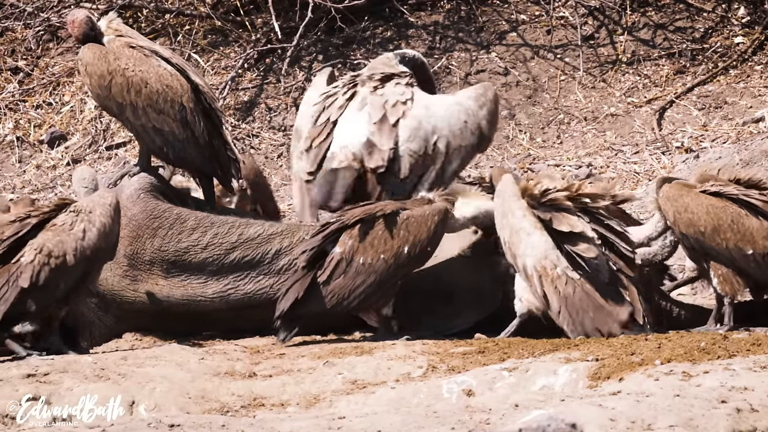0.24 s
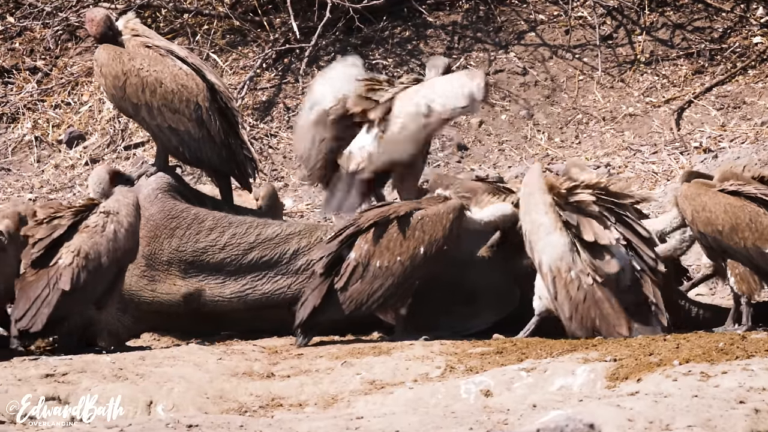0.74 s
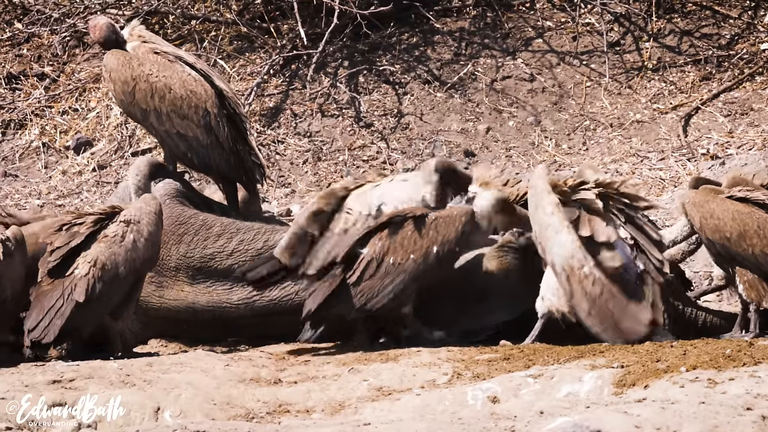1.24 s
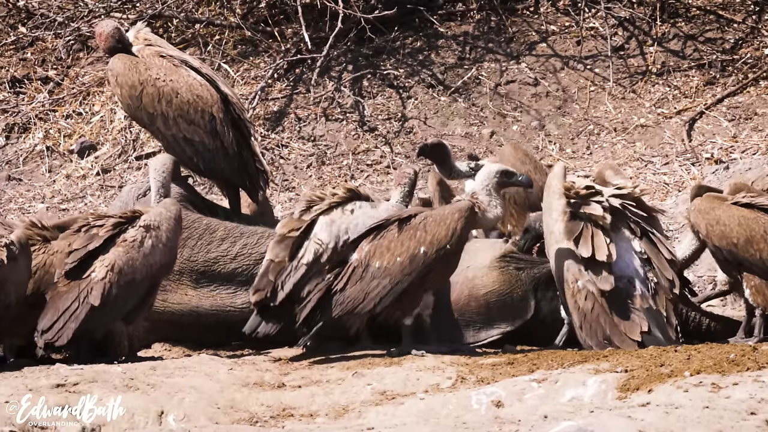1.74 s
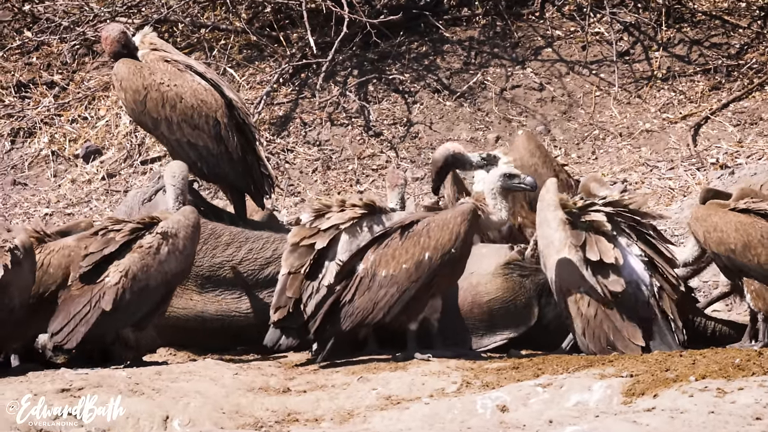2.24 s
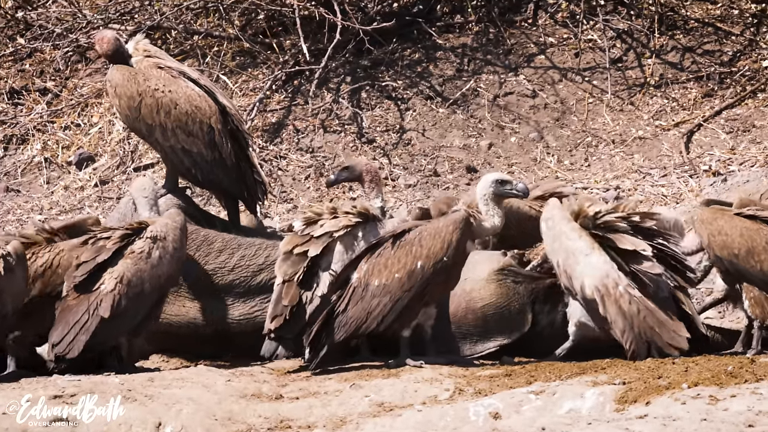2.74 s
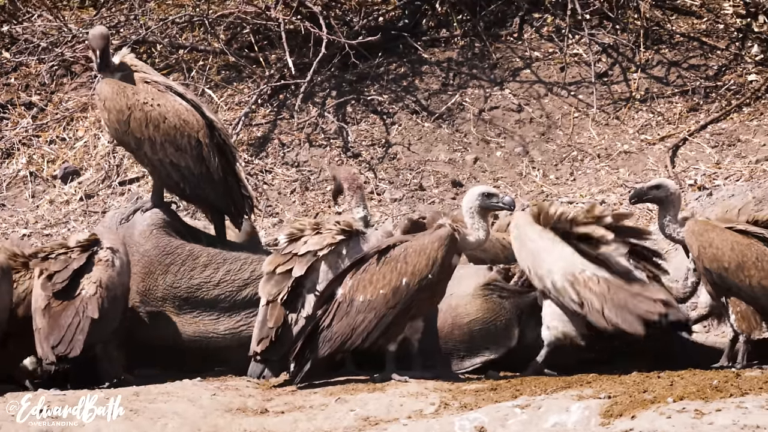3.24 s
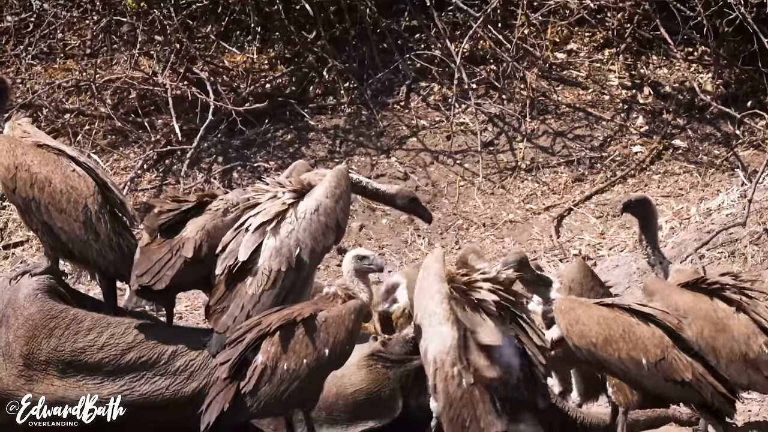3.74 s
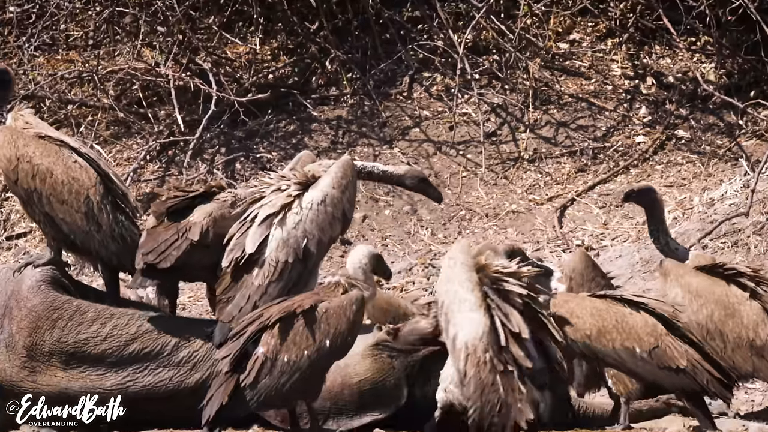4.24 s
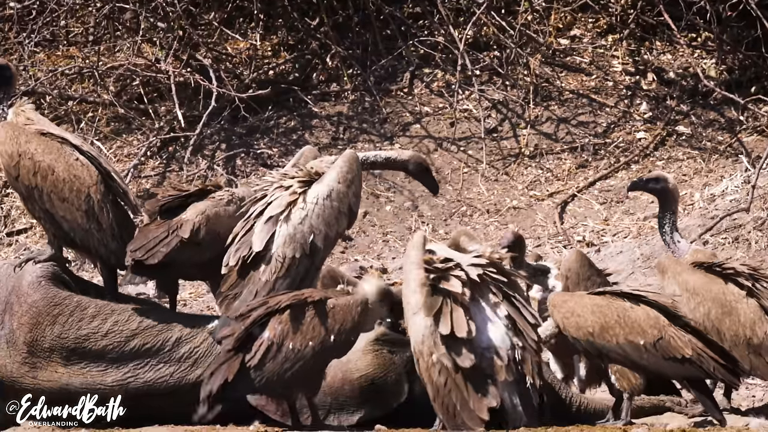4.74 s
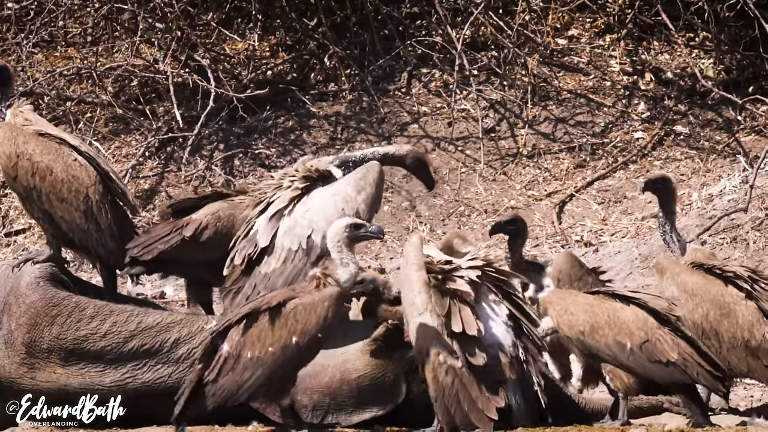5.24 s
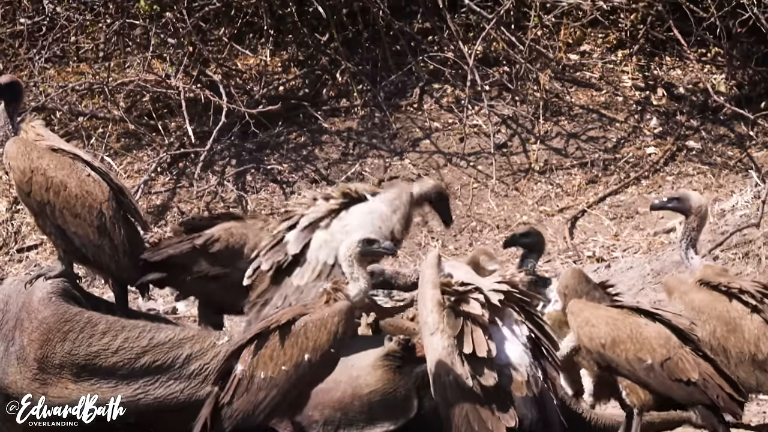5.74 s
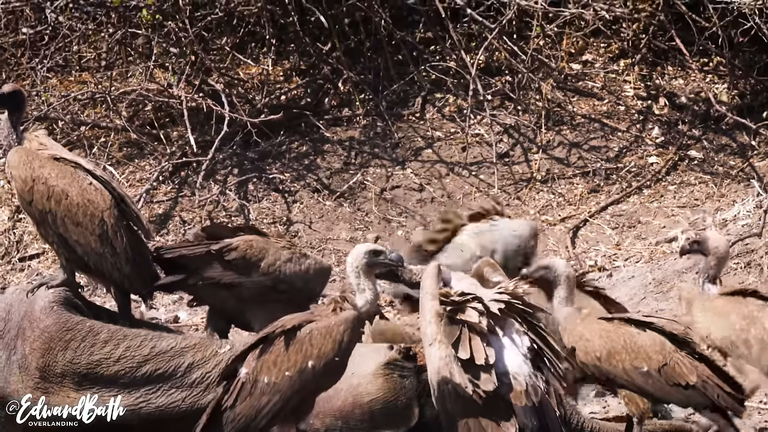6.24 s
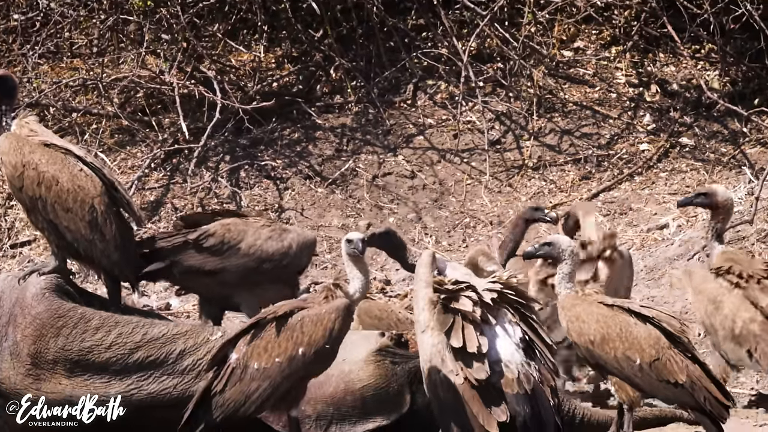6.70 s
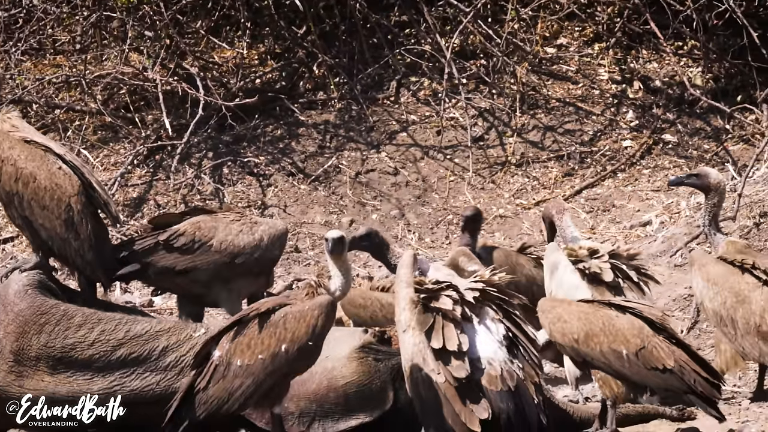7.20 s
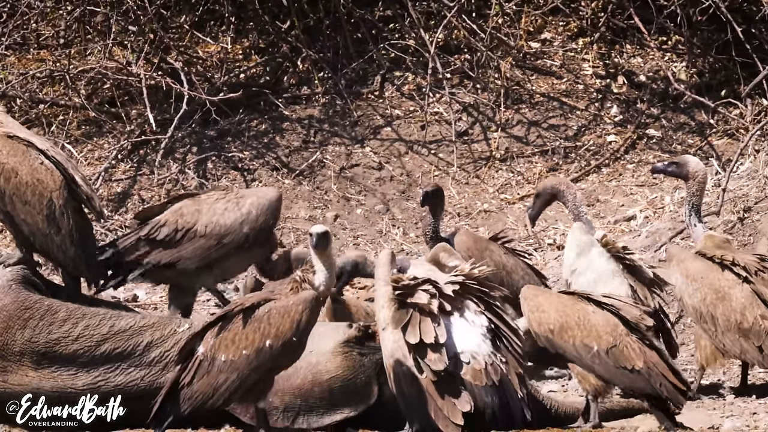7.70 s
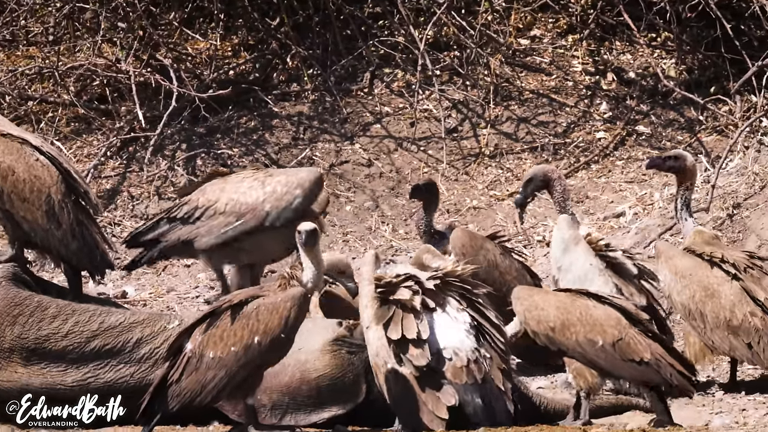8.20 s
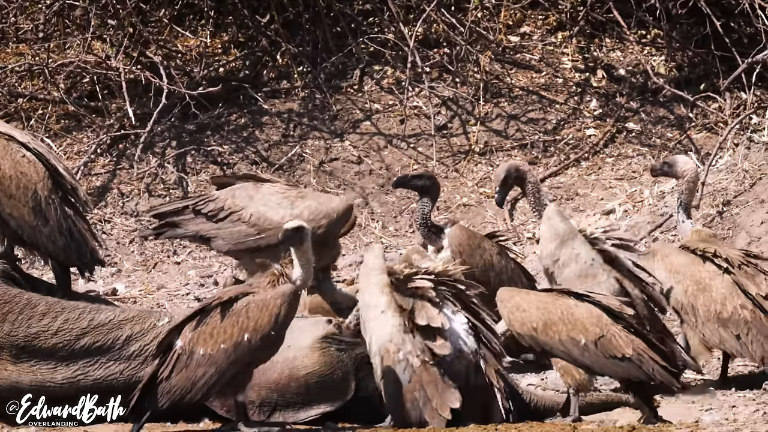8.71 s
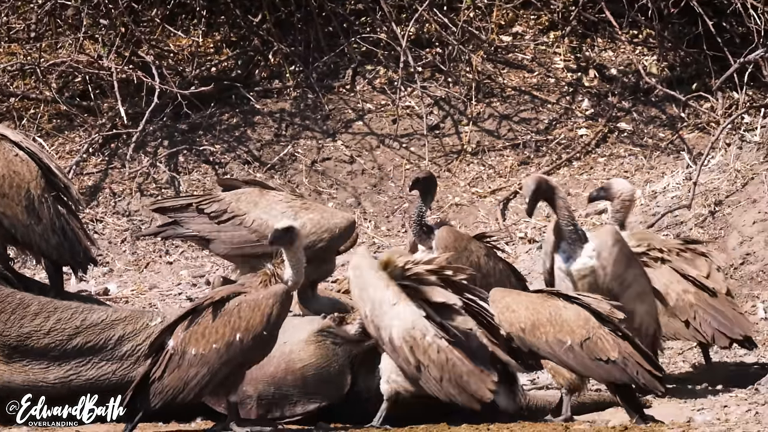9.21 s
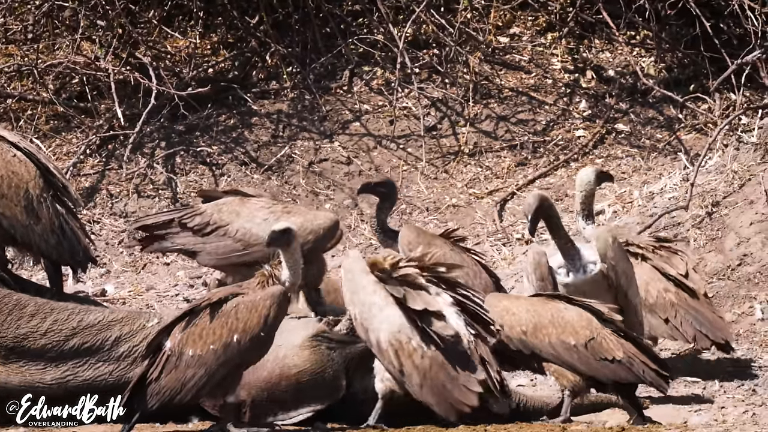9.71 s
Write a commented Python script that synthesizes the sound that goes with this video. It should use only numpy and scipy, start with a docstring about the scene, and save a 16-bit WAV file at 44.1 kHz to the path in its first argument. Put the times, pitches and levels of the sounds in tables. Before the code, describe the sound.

Vultures cackle, hiss at length and squawk harshly while low wind rumble buffets the microphone.

```python
"""Vultures squabble at a carcass: one cackles, a long hiss swells, and harsh squawks burst out close by.
Each call is a source and a filter: pulses or turbulent air excite the resonances of throat and beak.
Fine crackle rustles and fizzes with the hiss, and small birds whistle in the echoing scrub.
Wind buffets the microphone; beak snaps and the edges of wind pops make sharp knocks.
A limiter ducks the hardest peaks, and just before the hiss the sound drops out between two clicks."""
import sys
import numpy as np
from scipy import signal
from scipy.fft import rfft, irfft, next_fast_len
from scipy.io import wavfile
from scipy.ndimage import uniform_filter1d, minimum_filter1d

SR = 44100
rng = np.random.default_rng(int(sys.argv[2]) if len(sys.argv) > 2 else 0)


def unload_audio(sound):
    """Save the sound as a 16-bit wav file, at the path given as the first command line argument."""
    columns = np.transpose(np.atleast_2d(sound))
    # keep every value between -1 and 1, then stretch to whole-number steps
    steps = np.round(np.clip(columns, -1, 1) * 32767)
    wavfile.write(sys.argv[1], SR, steps.astype(np.int16))


N = 439236
TIME = np.arange(N) / SR
BAND_LIMIT_HZ = 15800
DROPOUT_START_S, DROPOUT_END_S = 3.3845, 3.4367


def amp(db):
    """The decibel scale: 20 dB is a factor of ten in amplitude."""
    return 10 ** (np.asarray(db) / 20)


def unit(x):
    """Normalisation to an RMS of 1."""
    return x / np.sqrt(np.mean(x ** 2) + 1e-20)


def curves(rows, t):
    """Linear interpolation of each column over the times in the first."""
    times, *columns = np.transpose(rows)
    return [np.interp(t, times, column) for column in columns]


def add(mix, start, sound):
    """Superposition: a sound joins the mix at its start time."""
    part = mix[round(start * SR):][:len(sound)]
    part += sound[:len(part)]


def at_frequency(points, hz):
    """Interpolation on a logarithmic frequency axis."""
    f, value = np.transpose(points)
    return np.interp(np.log(hz + 1), np.log(f + 1), value)


def noise(spectrum):
    """Spectral shaping of white noise, at unit RMS."""
    gain = amp(at_frequency(spectrum, np.fft.rfftfreq(N, 1 / SR)))
    return unit(irfft(rfft(rng.standard_normal(N)) * gain, N))


def drift(count, hz):
    """Random modulation: low-pass noise of about unit RMS."""
    size = next_fast_len(count + SR // 2)
    f = np.fft.rfftfreq(size, 1 / SR)
    return unit(irfft(rfft(rng.standard_normal(size)) / (1 + (f / hz) ** 4), size))[:count]


def resonate(x, hz, width):
    """A damped resonance of unit gain whose frequency may vary in time."""
    carrier = np.exp(2j * np.pi * np.cumsum(hz * np.ones(len(x))) / SR)
    pole = np.exp(-np.pi * width / SR)
    return 2 * (carrier * signal.lfilter([1 - pole], [1, -pole], x / carrier)).real


def formant(x, hz, width):
    """Two resonances in cascade give a peak with steep skirts."""
    return resonate(resonate(x, hz, width), hz, 2 * width)


def modes(x, rows, response=resonate):
    """Modal superposition: resonances driven in parallel."""
    return sum(amp(db) * response(x, hz, width) for hz, width, db in rows)


def colour(x, spectrum, size=2048):
    """Minimum-phase filtering: ringing follows each pulse and never precedes it."""
    log_gain = np.log(amp(at_frequency(spectrum, abs(np.fft.fftfreq(size, 1 / SR)))))
    impulse_response = np.fft.ifft(np.exp(np.conj(signal.hilbert(log_gain)))).real
    return signal.fftconvolve(x, impulse_response[:size // 2])


def arch(t, top_s, length):
    """A half-cosine envelope: 1 at its top, 0 outside its length."""
    return np.cos(np.pi * np.clip((t - top_s) / length, -.5, .5))


def gate(t, start, length, rise_s, fall_s):
    """An envelope with Gaussian attack, hold and exponential release."""
    return np.exp(-(np.maximum(start - t, 0) / rise_s) ** 2 - np.maximum(t - start - length, 0) / fall_s)


def open_air():
    """Ambient noise: open air and dry scrub make a broadband floor whose level wanders."""
    # spectrum of the air: (frequency [Hz], gain [dB])
    spectrum = [(100, 6.5), (500, 1.5), (1100, -3.5), (2000, -9.5), (4200, -13), (5500, -22.5), (9000, -37),
                (15000, -40)]
    # its slow envelope: (time [s], level [dB])
    levels = [(0, -63.5), (.7, -62.5), (1.4, -43.5), (2.3, -55.5), (3.0, -54), (3.5, -50), (9.96, -47.5)]
    return noise(spectrum) * amp(curves(levels, TIME)[0] + drift(N, 11))


def scrub_echo(x, reflections_per_s=2500):
    """Diffuse scattering: the bank and bushes return a short echo of many random reflections."""
    # reverberation of the scrub: (frequency [Hz], 60 dB decay time [s])
    decay_times = [(300, 0.16), (2000, 0.27), (3000, 0.36), (4500, 0.31), (10000, 0.16)]
    taps = rng.standard_normal(SR) * (rng.random(SR) < reflections_per_s / SR) * (TIME[:SR] > .006)
    hz, t, bands = signal.stft(taps, SR, nperseg=256)
    decay = amp(-60 * t / at_frequency(decay_times, hz)[:, None])
    tail = signal.istft(bands * decay, SR, nperseg=256)[1]
    return signal.fftconvolve(x, tail / np.linalg.norm(tail))[:N]


def wind(lumpy_db=1.2266, flutter_db=2.0, spent_db=-3):
    """Turbulent pressure: large eddies shake the microphone and small ones flutter on top."""
    # flow between buffets: (time [s], large eddies' relative level [dB], small eddies' level [dB])
    steady_flow = [(0.0, -13.5, -30.5), (1.22, -23, -32), (1.63, -16.5, -25), (1.97, -23, -34),
                   (3.05, -20, -27), (3.52, -24, -36.5), (4.44, -22.5, -30.5), (4.63, -21.5, -29.5),
                   (5.08, -13, -28.5), (5.57, -27.5, -30), (5.96, -28.5, -28.5), (6.21, -29.5, -25.5),
                   (7.16, -17.5, -29), (7.71, -30, -36), (8.43, -20, -22.5), (9.04, -18, -31.5),
                   (9.29, -24, -35.5), (9.96, -17.5, -26.5)]
    # buffets: (start [s], length [s], large eddies' relative level [dB], small eddies' level [dB])
    buffets = [(0.034, 0.062, -12, -22), (0.226, 0.0705, -14, -22), (0.357, 0.075, -8.5, -20.5),
               (0.626, 0.055, -15, -27.5), (0.706, 0.097, -16, -28.5), (1.094, 0.102, -16, -28),
               (1.423, 0.044, -10, -32.5), (1.552, 0.024, -13.5, -21.5), (1.655, 0.112, -9.5, -33),
               (2.041, 0.077, -14.5, -29), (2.222, 0.03, -13.5, -26), (2.362, 0.105, -11, -27),
               (2.581, 0.112, -11, -26.5), (2.745, 0.1924, -11, -23.5), (3.031, 0.044, -11.5, -23),
               (3.113, 0.165, -13, -24.5), (3.33, 0.037, -9, -22), (3.802, 0.027, -16, -42),
               (3.884, 0.029, -15.5, -31), (4.159, 0.0182, -16, -12.5), (4.251, 0.263, -11.5, -23),
               (4.591, 0.0224, -12.5, -22), (4.787, 0.18, -12, -26), (4.918, 0.142, -14.5, -21.5),
               (5.218, 0.0864, -11, -20.5), (5.442, 0.0395, -20.5, -23), (5.599, 0.0253, -15, -33),
               (5.769, 0.051, -19, -20.5), (5.859, 0.0446, -19, -18.5), (6.061, 0.0283, -7, -20.5),
               (6.159, 0.0186, -10.5, -22.5), (6.231, 0.0786, -14, -31.5), (6.354, 0.024, -12, -25.5),
               (6.475, 0.0306, -14.5, -19.5), (6.609, 0.1044, -13, -20.5), (6.89, 0.043, -5, -21),
               (6.972, 0.15, -11.5, -31), (7.42, 0.0337, -16.5, -24), (7.551, 0.0494, -13.5, -25),
               (7.763, 0.034, -16, -19.5), (7.858, 0.163, -13, -25.5), (8.396, 0.266, -11, -20.5),
               (8.719, 0.045, -15, -21.5), (8.78, 0.049, -11.5, -28), (8.893, 0.343, -9.5, -22.5),
               (9.422, 0.046, -11.5, -27), (9.511, 0.042, -14.5, -26.5), (9.67, 0.3, -13, -24),
               (9.933, 0.0124, -11, -22)]
    # rumble of large eddies: (frequency [Hz], gain [dB])
    large_spectrum = [(12, -18.5), (22, -2), (40, 4.5), (60, 3), (85, -3), (125, -19), (160, -25),
                      (260, -45), (600, -99.5)]
    # flutter of small eddies: (frequency [Hz], gain [dB])
    small_spectrum = [(60, -14), (110, 11), (138, 3), (200, -4), (280, -13), (400, -24.5), (700, -36.5),
                      (1500, -47), (5000, -87.5)]
    t = TIME[::64]
    large, small = amp(curves(steady_flow, t))
    for start, length, large_db, small_db in buffets:
        fade = amp(spent_db * np.clip((t - start) / length, 0, 1) ** 2)
        blow = gate(t, start, length, rise_s=.01975, fall_s=.014) * fade
        large = np.maximum(large, amp(large_db) * blow)
        small = np.maximum(small, amp(small_db) * blow)
    lumps, out = drift(N, 13), np.zeros(N)
    layers = (large_spectrum, amp(-1) * large, lumpy_db), (small_spectrum, small, flutter_db)
    for spectrum, level, depth_db in layers:
        flow = noise(spectrum)
        running_rms = np.sqrt(uniform_filter1d(flow ** 2, size=2600))
        out += np.interp(TIME, t, level) * amp(depth_db * lumps) * flow / running_rms
    return out


def eddy_pops():
    """A bipolar pressure pulse: each eddy passing the microphone swings the pressure up, then down."""
    # single eddies: (time [s], peak level [dB], swing frequency [Hz])
    eddies = [(0.048, -8.5, 92.5), (1.674, -6, 90), (2.766, -31.5, 129.7), (3.346, -4, 103.5),
              (4.155, -21, 148), (4.443, -11.5, 143), (5.021, -16.5, 137), (5.433, -12.5, 119),
              (5.465, -11, 148), (5.764, -8.5, 96.3), (6.349, -8, 108), (6.492, -17.5, 179),
              (6.8755, 9, 158), (7.415, -10.5, 160), (8.247, -11, 185), (8.567, -20.5, 160),
              (9.449, -12, 120)]
    out, t = np.zeros(N), np.arange(-.03, .03, 1 / SR)
    for centre, db, hz in eddies:
        phase = 2 * np.pi * hz * t
        swing = -phase * np.exp(-(phase ** 2 / 2 + .004) ** .7)
        add(out, centre + t[0], amp(db) * swing / swing.max())
    return out


def whistles():
    """Frequency modulation: small birds sing gliding sine tones; the same glides, scattered widely in pitch,
    make a harsh rasp near 3.7 kHz."""
    # notes, including a harsh rasp near 3.7 kHz from 8.85 s: (start [s], length [s], first pitch [Hz], last
    # pitch [Hz], level [dB], scatter [fraction])
    notes = [(2.612, 0.113, 6300, 7160, -78, 0.0102), (2.863, 0.07, 3200, 3620, -63.5, 0.0157),
             (2.892, 0.0444, 5830, 6940, -68, 0.0093), (2.897, 0.047, 7300, 8670, -71.5, .01),
             (3.564, 0.195, 5770, 6400, -72, 0.0048), (3.66, 0.079, 7800, 8100, -72.5, .008),
             (6.846, 0.039, 6500, 6720, -62, .012), (7.02, 0.144, 5510, 6510, -69.5, .005),
             (7.102, .1, 7750, 8150, -70.5, 0.0081), (7.16, 0.046, 6550, 6390, -62, 0.0114),
             (7.927, 0.092, 4880, 3170, -54.5, 0.0226), (8.009, 0.0487, 2917, 3123, -49, .02),
             (8.816, 0.06, 3144, 3940, -42.5, 0.0217), (8.849, 0.099, 3720, 3687, -46, 0.0676),
             (8.95, 0.098, 3800, 3698, -54.5, 0.0495), (9.122, 0.072, 3750, 3860, -60, 0.0475),
             (9.298, 0.067, 4107, 4620, -63.5, 0.027)]
    out = np.zeros(N)
    for start, length, first_hz, last_hz, db, scatter in notes:
        count = round(length * SR)
        hz = np.geomspace(first_hz, last_hz, count) * (1 + scatter * drift(count, 350))
        tone = np.sin(2 * np.pi * np.cumsum(hz) / SR)
        flutter = amp(1.5 * drift(count, 150))
        add(out, start, amp(db) * unit(tone * flutter * signal.windows.tukey(count, .7)))
    return out


def fine_crackle(crackles_per_s=450, rest_db=-71, clump_db=2.5):
    """Shot noise: tiny uneven crackles make a rustling, and the high fizz that swells with the hiss."""
    # bouts of fine crackle: (time of peak [s], length [s], level [dB])
    bouts = [(1.446, 0.66, -64), (3.127, 0.32, -60), (2.329, 0.254, -69.5), (3.319, 0.136, -57),
             (4.152, 1.45, -62.5), (6.403, 2.7, -59), (8.502, 0.83, -70), (8.919, 0.24, -53.5),
             (9.65, .24, -60)]
    # spectrum of the crackles: (frequency [Hz], gain [dB])
    spectrum = [(400, -11.5), (1500, 3), (3800, 3), (6000, -8), (9000, -12.5), (15000, -13.5)]
    clicks = (rng.random(N) < crackles_per_s / SR) * amp(3.5 * np.minimum(rng.exponential(1, N), 3))
    crackle = signal.oaconvolve(clicks, np.exp(-TIME[:300] / .0042))[:N] * rng.standard_normal(N)
    level = amp(rest_db) + sum(amp(db) * arch(TIME, top, length) ** 2 for top, length, db in bouts)
    return unit(colour(crackle, spectrum)[:N]) * level * amp(clump_db * drift(N, 12))


def sharp_knocks():
    """Impulsive excitation: beak snaps and the hard edges of wind pops on the microphone ring briefly."""
    # knocks: (time [s], peak level [dB], ring frequency [Hz], 60 dB decay time [s], body gain [dB])
    knocks = [(.338, -51, 3020, .03, -34), (.356, -53, 3297, 0.031, -34), (.512, -48, 800, 0.022, -18),
              (0.764, -53, 3570, 0.03, -33), (.802, -52.5, 3840, 0.06, -30.5),
              (.876, -52.5, 4200, 0.055, -31), (3.04, -52.5, 4800, .05, -29.5),
              (3.111, -44, 3005, 0.076, -14.5), (3.293, -57, 4000, .05, -29.5),
              (3.341, -49.5, 5500, 0.038, -30), (3.342, -28.5, 400, 0.032, -20),
              (4.192, -39.5, 3400, 0.0175, -30), (4.52, -38.5, 3400, .02, -30),
              (4.557, -40, 3370, 0.0196, -30), (5.4294, -23.5, 1736, 0.0079, 2),
              (5.432, -26, 640, 0.029, 7), (6.349, -40.5, 6880, 0.019, -30),
              (6.874, -3, 402, 0.0125, -28.5), (7.018, -30.5, 900, 0.032, -8.5),
              (7.411, -22.5, 542, 0.0204, -5), (9.557, -36, 1370, 0.03, -3)]
    # hollow body, the carcass under a beak: (frequency [Hz], bandwidth [Hz], gain [dB])
    body_modes = [(714, 45, 1), (1080, 40, -5.5), (1203, 31, -6), (2080, 250, -2.5)]
    out = np.zeros(N)
    for start, db, hz, t60, body_db in knocks:
        t = np.arange(0, t60, 1 / SR)
        burst = np.pad(rng.standard_normal(len(t)) * amp(-60 * t / t60), (0, SR // 20))
        spectrum = [(hz / 4, -10), (hz, 0), (2 * hz, -5), (2.415 * hz, -17), (5 * hz, -38),
                    (10 * hz, -55)]
        ring = colour(burst, spectrum)
        knock = ring + amp(body_db) * modes(ring, body_modes)
        add(out, start, amp(db) * knock / abs(knock).max())
    return out


def hiss(end_s=9.12, release_s=.027, flutter_db=1.4):
    """Turbulence excites a vulture's long throat; the upper formants grow as effort opens the beak."""
    # breath: (time [s], effort [dB], bright edge gain [dB], lowest formant gain [dB], its tuning [ratio])
    breath = [(3.44, -46.5, -5, 3, 0.926), (3.72, -42.5, -12.5, 1.5, 0.988), (4.05, -39, -11.5, 4, 1.023),
              (4.25, -37.5, -6.5, 2, 0.93), (4.45, -45.5, -5, 0, 1.01), (4.85, -44, -5, -1, 1.01),
              (5.35, -48.5, -5.5, -3.5, 1.02), (5.6, -46.5, -8.5, -2, 0.993), (6.07, -42, -7.5, 1, 0.99),
              (6.35, -43.5, -10, 1.5, 1.033), (6.8, -38, -3.5, 2, 1.036), (7, -48, -8.5, -1.5, 0.964),
              (7.4, -42, -7, 0, 1), (7.95, -38.5, -5.5, -1.5, 1), (8.33, -33.5, -7, 0, 1.045),
              (8.65, -37.5, -6, -1.5, 0.996), (8.95, -37, -1, 3, 1.05), (9.1, -62, 6, 0, 1.01)]
    # throat formants, lowest first: (frequency [Hz], bandwidth [Hz], gain [dB])
    formants = [(680.2, 123, -1.5), (1118.6, 121.3, 0.5), (1177.9, 75.3, -1.5), (1501, 225, -0.5),
                (1688, 288, -8.5), (2164, 166, -3.5)]
    # bright edge of the hiss: (frequency [Hz], gain [dB])
    edge_spectrum = [(1500, -12), (2800, 2.5), (3300, 3), (3750, 4), (4250, -6.5), (4650, -3.5),
                     (5400, -14), (6900, -11.5), (8200, -39.5), (15000, -43)]
    # hollow ringing in that edge: (frequency [Hz], bandwidth [Hz], gain [dB])
    edge_modes = [(2336, 70, 0), (2917, 74, -6), (3871, 90, -8.5), (4647, 130, -3)]
    effort_db, edge_db, low_db, tuning = curves(breath, TIME)
    open_db = .26 * (effort_db + 42)
    flow = noise([(200, 2), (600, 11.5), (2400, 0), (5000, -31.5), (15000, -37)])
    low_hz, low_width, low_gain_db = formants[0]
    lowest = amp(low_gain_db + low_db) * formant(flow, low_hz * tuning, low_width)
    upper = modes(flow, formants[1:], formant)
    throat = unit(lowest * amp(-.7 * open_db) + upper * amp(open_db))
    rush = noise([(200, 5.5), (500, -3), (900, -7.5), (1320, -12.5), (1900, -12), (3000, -20),
                  (6000, -29), (15000, -33.5)])
    edge = noise(edge_spectrum)
    edge = unit(edge + modes(edge, edge_modes))
    air = amp(-1.96) * throat + amp(.83) * rush + amp(edge_db - 4.5) * edge
    held = (TIME > DROPOUT_END_S) * np.clip((end_s - TIME) / release_s, 0, 1)
    return held * amp(effort_db + flutter_db * drift(N, 47)) * air


def airflow(hz, rough, jitter):
    """The voice source and its phase in cycles: roughness trades harmonic pulses for unsteady puffs."""
    rough = np.clip(rough, 0, 1)
    cycles = np.cumsum(hz * (1 + jitter * rough * drift(len(hz), 250))) / SR
    pulses = sum(np.cos(2 * np.pi * k * cycles) * (k * hz < BAND_LIMIT_HZ) for k in range(1, 32))
    puffs = (.36 + np.exp(-(cycles % 1) / .61)) * rng.standard_normal(len(hz))
    return (1 - rough) * unit(pulses) + rough * unit(puffs), cycles


def squawks(sink_hz_per_s=7010, rattle_hz=103):
    """Saturation: overblown pulses rattle through the throat and open beak; the windpipe rings on."""
    # bursts: (start [s], length [s], level [dB], pulse rate [Hz], roughness [0-1], resonance [Hz])
    bursts = [(6.539, 0.0156, -39.5, 614, 0.3, 2900), (6.552, 0.0299, -27, 492.8, 1, 2373),
              (6.707, 0.0066, -23.5, 707, 0.02, 3290), (6.714, 0.0375, -19.5, 462, 0.56, 3114),
              (6.802, 0.0096, -26, 569.2, 0.03, 3210), (6.91, 0.025, -37.5, 580, 0.9, 4110),
              (7.028, 0.02, -45, 596, 0.8, 2810)]
    # response of the wide-open beak: (frequency [Hz], gain [dB])
    beak = [(500, -19), (1400, -13.5), (1850, -3), (2100, -2.5), (2750, 1.5), (3300, -8.5), (4000, -1),
            (5000, -5), (5600, -2), (6500, -11.5), (7700, -13.5), (9000, -24), (11000, -29), (15000, -57.5)]
    # narrow modes of the windpipe: (frequency [Hz], bandwidth [Hz], gain [dB])
    windpipe = [(1858, 31, 7.5), (2799, 42, -4), (3660, 30, 7.5), (4128, 23, 4)]
    out = np.zeros(N)
    for start, length, db, hz, rough, throat_hz in bursts:
        count = round(length * SR)
        t = TIME[:count]
        sinking_hz = throat_hz - sink_hz_per_s * (t - length / 2)
        pulses, _ = airflow(hz * sinking_hz / throat_hz, rough, jitter=.12)
        throat = unit(pulses + amp(9.5) * resonate(pulses, sinking_hz, 930))
        overblown = unit(np.tanh(rough * throat))
        crackle = amp(2.5 * drift(count, 450))
        rattle = 1 + .099 * np.cos(2 * np.pi * rattle_hz * t)
        burst = overblown * crackle * rattle * signal.windows.tukey(count, .4)
        voice = colour(np.pad(burst, (0, SR // 10)), beak)
        voice = voice + modes(voice, windpipe)
        add(out, start, amp(db) * voice / np.sqrt(np.sum(voice ** 2) / count))
    return out


def wheeze(wobble=.05, broken_db=1.5):
    """A swept resonance: the cackle's last air is a hoarse whistle that climbs, wobbles and breaks up."""
    # breath: (time [s], pitch [Hz], level [dB], roughness [0-1], main resonance [Hz])
    breath = [(1.76, 1329, -55, 0.9, 2480), (1.83, 1344, -58, .9, 2255), (1.88, 1356, -53, 0.87, 2340),
              (1.95, 1340, -52, 0.95, 2477), (2.1, 1357, -59.5, 0.39, 2692), (2.19, 1286, -59, 0.5, 2753),
              (2.24, 1192, -62.5, 0.45, 3604)]
    # side formants of the throat: (frequency [Hz], bandwidth [Hz], gain [dB])
    formants = [(1332, 55, -3.5), (2555, 480, -8), (3820, 130, -7.5), (4050, 890, -10.5)]
    t = np.arange(breath[0][0], breath[-1][0], 1 / SR)
    hz, db, rough, throat_hz = curves(breath, t)
    drive, _ = airflow(hz * (1 + .005 * drift(len(t), 45)), rough, jitter=.036)
    wobbling_hz = throat_hz * (1 + wobble * rough ** 2 * drift(len(t), 50))
    voice = amp(-1) * resonate(drive, wobbling_hz, 70) + modes(drive, formants, formant)
    broken = unit(voice * amp(broken_db * drift(len(t), 70)))
    out = np.zeros(N)
    add(out, t[0], amp(db) * broken * signal.windows.tukey(len(t), .1))
    return out


def cry(hz, rough, throat_hz, chest_db, core_db, bite_hz, bite_db, shimmer_db=2.01):
    """Source and filter of the cackle: pulses and breath pass a wavering throat and a gaping beak."""
    # side resonances of the throat: (frequency [Hz], bandwidth [Hz], gain [dB])
    throat_modes = [(620, 200, -10.5), (1280, 200, -30.5), (3525, 350, 1), (4300, 290, -14.5)]
    count, rough = len(hz), np.clip(rough, 0, 1)
    pulses, cycles = airflow(hz * (1 + .005 * drift(count, 160)), rough ** 2, jitter=.035)
    pulses = pulses * amp(shimmer_db * drift(count, 200))
    # overtones fade out in the treble, where breath takes over
    pulses = colour(pulses, [(4500, -8), (5200, -15), (15000, -19.5)])[:count]
    breath = amp(-16) * (.3 + rough) * unit(resonate(rng.standard_normal(count), 6300, 2500))
    drive = pulses + breath
    wavering_hz = throat_hz * (1 + .025 * rough * drift(count, 80))
    broad_base = resonate(drive, wavering_hz + 300, 1000)
    singing_core = amp(core_db) * resonate(drive, wavering_hz, 130)
    voice = broad_base + singing_core + modes(drive, throat_modes)
    bite = amp(bite_db) * resonate(voice, bite_hz, 640)  # bright resonance of the gaping beak
    timbre = [(300, -1), (1000, 2.5), (1900, 1), (3000, -3.5), (4450, -3), (5100, -5), (7000, -6.5),
              (9000, -8.5), (15000, -23.5)]
    fundamental = amp(chest_db) * np.sqrt(2) * np.cos(2 * np.pi * cycles)
    return unit(colour(voice + bite, timbre)[:count]) + fundamental


def screeches(sag_per_s=.12, edge_s=.015):
    """Joint modulation: in the cackle's held notes, pitch and resonance quaver and sag as air runs out."""
    # notes: (start [s], length [s], pitch [Hz], level [dB], roughness [0-1], main resonance [Hz],
    # added fundamental [dB], singing core gain [dB], bite gain [dB])
    notes = [(1.347, 0.08, 667.6, -39.5, 0.2, 2025, 1, 4, -16),
             (1.413, 0.1376, 443.2, -43.5, 0.63, 1773, -18, 4.5, -8),
             (1.578, 0.1002, 444.7, -41.5, 0.66, 1772, -16.5, 3.5, 0),
             (1.674, 0.2, 447.7, -55, 0.7, 1807, -23.5, -14.5, 2)]
    out = np.zeros(N)
    for start, length, hz, db, rough, throat_hz, chest_db, core_db, bite_db in notes:
        t = np.arange(0, length, 1 / SR)
        bend = (1 - sag_per_s * t) * (1 + .009 * drift(len(t), 35))
        rattle = amp(3 * rough * drift(len(t), 110))
        voice = cry(hz * bend, rough, throat_hz * bend, chest_db, core_db, bite_hz=2850, bite_db=bite_db)
        envelope = signal.windows.tukey(len(t), 2 * edge_s / length)
        add(out, start, amp(db) * unit(rattle * voice) * envelope)
    return out


def yelps(rest_hz=412.6, rest_db=-55.5, rest_rough=.58, resonance_rise=.059):
    """Driving pressure: each push of air that opens the cackle makes it higher, louder and clearer."""
    # pushes: (time of top [s], rise [s], fall [s], top pitch [Hz], level [dB], roughness [0-1],
    # bite gain [dB], main resonance [Hz])
    pushes = [(0.919, 0.034, .025, 626.6, -40.5, 0, -19, 2462),
              (1.034, 0.0429, .032, 609.2, -41.5, 0.2, -16.5, 2425),
              (1.146, 0.048, .022, 682.5, -39.5, 0.47, 0, 2484),
              (1.222, 0.026, 0.0218, 580.2, -38.5, 0.28, -3, 2278),
              (1.3, .03, .032, 460.4, -44, .1, -7.5, 2280),
              (1.341, 0.019, 0.015, 451.9, -47, 0.1, -13, 2225),
              (1.36, 0.0121, 0.0134, 716.5, -37.5, 0.3, -15, 2124)]
    start, end = pushes[0][0] - pushes[0][1], pushes[-1][0] + pushes[-1][2] + .015
    t = np.arange(start, end, 1 / SR)
    hz, level, rough, tuning = rest_hz, amp(rest_db), rest_rough, 1 - resonance_rise
    for top_s, rise, fall, top_hz, db, top_rough, *_ in pushes:
        push = arch(t, top_s, 2 * np.where(t < top_s, rise, fall))
        hz = hz + (top_hz - rest_hz) * push
        level = level + (amp(db) - amp(rest_db)) * push ** .9
        rough = rough + (top_rough - rest_rough) * push
        tuning = tuning + resonance_rise * push
    bite_db, throat_hz = curves(pushes, t)[-2:]
    voice = cry(hz, rough, throat_hz * tuning, chest_db=-20, core_db=8, bite_hz=3910, bite_db=bite_db)
    out = np.zeros(N)
    add(out, start, level * voice * signal.windows.tukey(len(t), .01))
    return out


def scene():
    """Superposition of birds and wind; far sounds carry a larger share of echo than near ones."""
    far = yelps() + screeches() + wheeze() + whistles()
    near = sharp_knocks() + squawks()
    air = open_air()
    echo = scrub_echo(amp(-8) * far + amp(-17) * near)
    return (far + near + echo + hiss() + fine_crackle() + air + wind() + eddy_pops())[None]


def record(dry, ceiling=.851, recovery_db_per_s=110):
    """Peak limiting ducks everything after the hardest pops; a brief dropout and a low-pass follow."""
    # clicks as the sound breaks off and returns: (time [s], level [dB])
    clicks = [(3.3846, -16), (3.4369, -30)]
    over_db = np.maximum(20 * np.log10(abs(dry[0]) / ceiling + 1e-9), 0)
    recovery_db = TIME * recovery_db_per_s
    duck_db = np.maximum.accumulate(over_db + recovery_db) - recovery_db
    limited = dry[0] * amp(uniform_filter1d(minimum_filter1d(-duck_db, size=121), size=121))
    interrupted = limited * ((TIME < DROPOUT_START_S) | (TIME > DROPOUT_END_S))
    for start, db in clicks:
        add(interrupted, start, amp(db) * np.exp(-TIME[:100] / .00043))
    low_pass = signal.firwin(511, BAND_LIMIT_HZ, window=("kaiser", 9), fs=SR)
    return signal.oaconvolve(interrupted, low_pass, "same")[None]


dry = scene()
out = record(dry)
unload_audio(out)
```